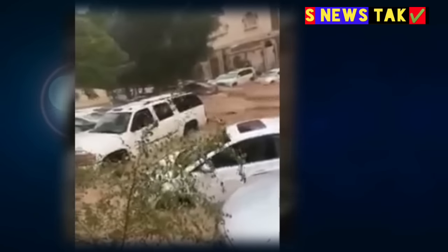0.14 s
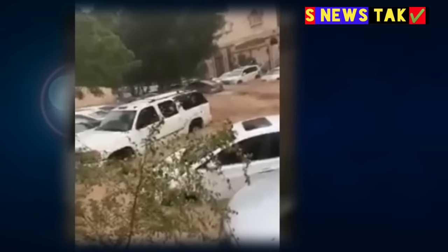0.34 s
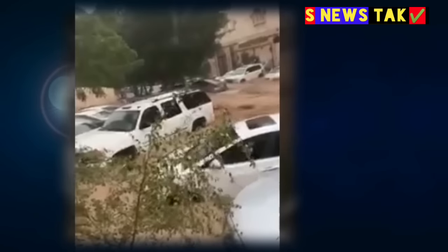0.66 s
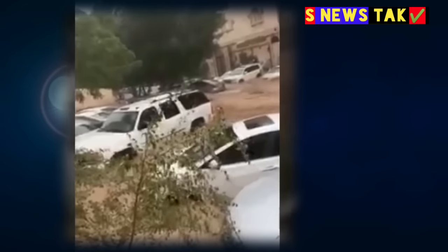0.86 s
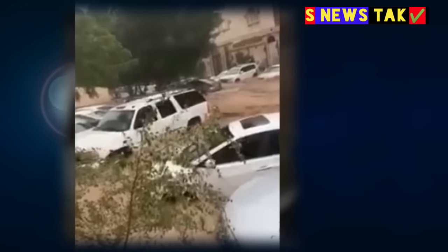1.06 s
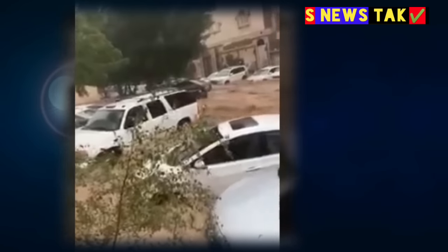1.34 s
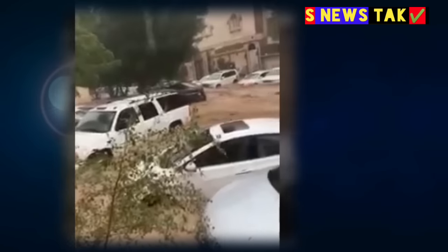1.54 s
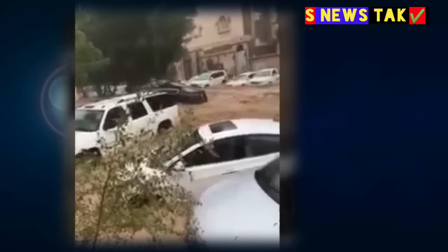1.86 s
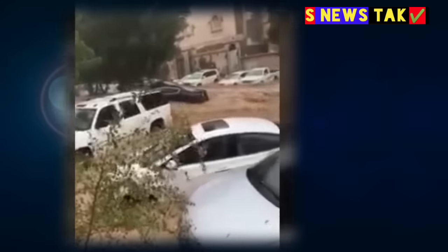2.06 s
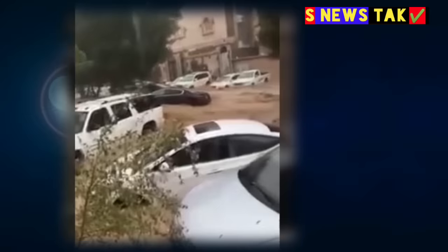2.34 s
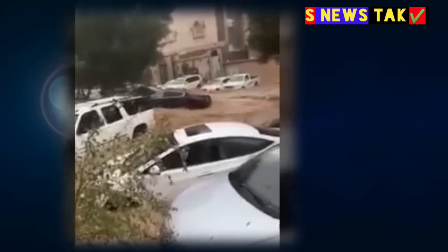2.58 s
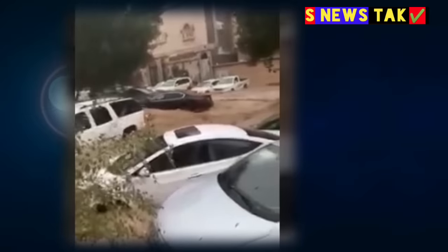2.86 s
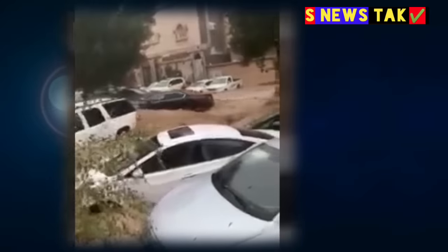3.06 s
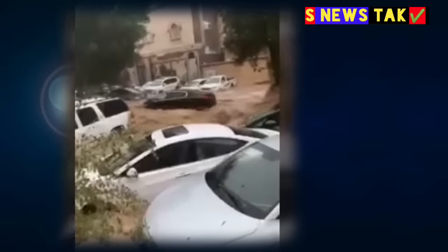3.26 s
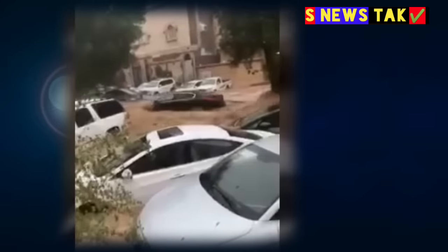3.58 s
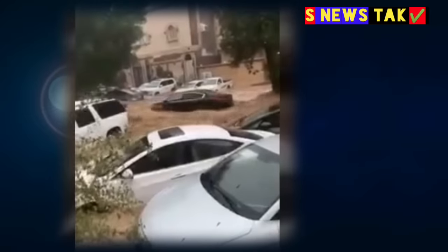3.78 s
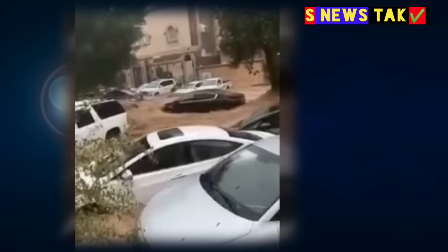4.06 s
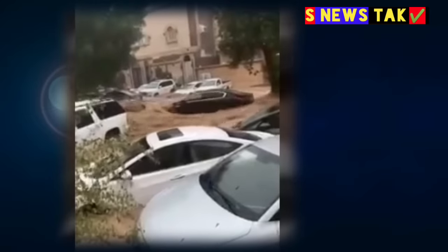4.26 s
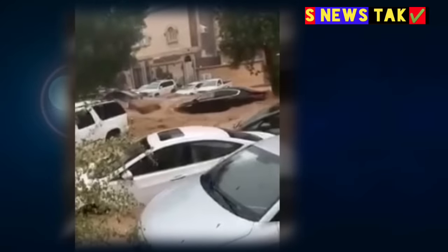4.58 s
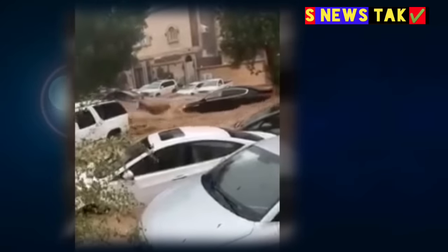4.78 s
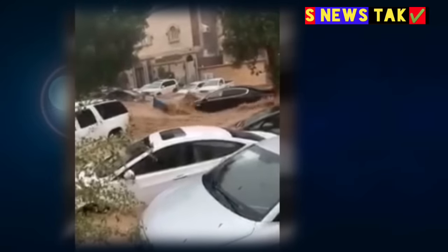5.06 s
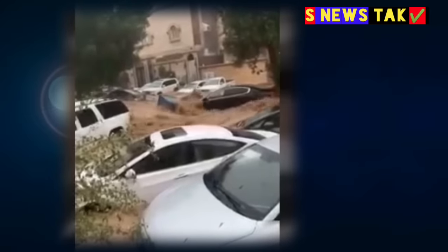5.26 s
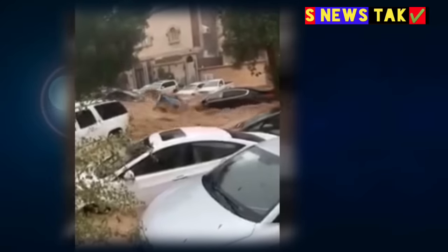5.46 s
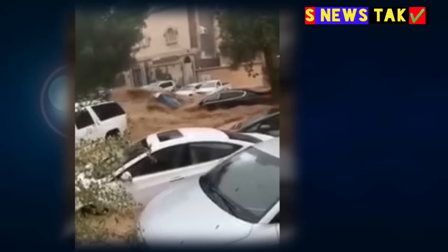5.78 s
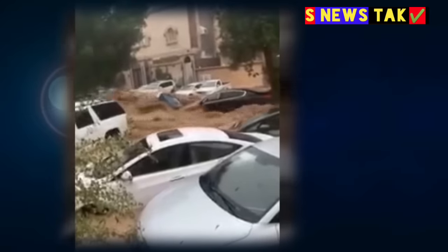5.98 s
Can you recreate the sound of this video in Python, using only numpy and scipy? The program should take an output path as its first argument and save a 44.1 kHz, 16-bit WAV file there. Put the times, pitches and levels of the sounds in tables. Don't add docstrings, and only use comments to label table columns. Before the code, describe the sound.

Loud floodwater runs unbroken for about six seconds: a broad, heavy roar in the lows and low mids, with a softer mid-high hiss of breaking crests, both wavering gently together. At 0.2 s debris gives a quick dull double thump with a small tick; a faint tap follows at 1.0. Around 1.85 a firmer knock on a car panel brings a brief crumple, and a lighter knock lands at 2.6. Low hollow booms pulse under the water, fuller from about 2.3 to 3.1 and again near 4.5. At 4.97 the heaviest blow hits, a tight cluster of bangs with a crunch of sheet metal fading over a few tenths, then low thuds and a deep rumbling swell around 5.4 to 5.7. The torrent pushes on to the end. Close, mono phone sound, outdoors from a doorway, with no distinct echo.

```python
import sys
import numpy as np
from scipy import signal
from scipy.fft import rfft, irfft, next_fast_len
from scipy.io import wavfile
from scipy.ndimage import uniform_filter1d, map_coordinates

SR = 44100
rng = np.random.default_rng(int(sys.argv[2]) if len(sys.argv) > 2 else 0)


def voltage_ratio(level):
    return 10 ** (np.asarray(level, float) / 20)


def generate_wav(signal):
    frames = np.transpose(np.atleast_2d(signal))
    scaled = np.clip(frames, -1, 1) * 32767
    pcm = np.round(scaled).astype(np.int16)
    wavfile.write(sys.argv[1], SR, pcm)


N = 270333

# time_s, level_db
FLOW = [
    (0, -1),
    (1.1, .5),
    (1.5, -0.7),
    (3.7, 0.5),
    (4.9, 0),
    (5.53, 1),
    (5.7, -0.5),
    (6.13, 1),
]
# freq_hz, density_db (per Hz)
ROAR = [(40, -63), (70, -8), (110, 2), (170, -0.5), (290, -5.5), (460, -5.5), (580, -8.5), (700, -14.5),
        (1000, -16.5), (1300, -27.5), (1600, -46), (2500, -120)]
# freq_hz, density_db (per Hz)
SPRAY = [(760, -45.5), (1300, -16.5), (1500, 1), (1590, 1), (2050, -6), (2560, -5.5), (4320, -21.5),
         (6030, -22), (8170, -31), (8700, -39), (10200, -43.5), (11800, -35), (12500, -31), (13900, -33.5),
         (14300, -39)]


def torrent():
    flow_db, = curves(FLOW)
    surge = wobble(knots_per_s=3.09)

    roar_source = patchy(patchy_db=0.06) + 0.25 * splashes(spread_db=2.5, count=3000)
    roar_gain = voltage_ratio(-22.0 + flow_db + 0.38 * surge + 0.21 * wobble(knots_per_s=9))
    roar = roar_gain * coloured(roar_source, ROAR)

    spray_source = patchy(patchy_db=1.1) + 0.24 * splashes(spread_db=2.0, count=12000)
    spray_gain = voltage_ratio(-33.69 + 0.71 * flow_db + 0.46 * surge + 0.37 * wobble(knots_per_s=12))
    spray = spray_gain * coloured(spray_source, SPRAY)
    return roar + spray


def patchy(patchy_db):
    bins = signal.stft(rng.standard_normal(N), nperseg=512)[2]
    field = uniform_filter1d(rng.standard_normal(bins.shape), size=6, axis=0)
    field = uniform_filter1d(field, size=10, axis=1)
    noise = signal.istft(bins * voltage_ratio(patchy_db * unit(field)), nperseg=512)[1]
    return unit(noise[:N])


def splashes(spread_db, count):
    when, rarity, side = rng.random((count, 3)).T
    size = voltage_ratio(-spread_db * np.log(1 - rarity)) * np.sign(side - 0.5)
    return unit(np.bincount((when * N).astype(int), size, N))


# start_s, ring_db, pitch_hz, t60_s, tick_db
KNOCKS = [(0.2269, -9, 274, 0.037, -8), (0.2334, -6.5, 135, 0.086, -30), (0.253, -12, 55.7, 0.1, -36),
          (1.0236, -19, 306.5, 0.025, -11), (1.853, -6.5, 426, 0.052, -24), (1.863, -7.5, 284, 0.062, -32),
          (1.9, -18.5, 239.4, 0.26, -27), (2.611, -13.5, 205, 0.058, -9), (4.966, -1.5, 202, .09, -16),
          (4.982, -7.5, 357.4, 0.12, -11), (4.989, -12, 340, 0.09, -10), (5.0, -11.5, 56.3, 0.24, -20),
          (5.02, -11, 120, 0.071, -13), (5.053, -9, 294.2, 0.07, -11), (5.234, -26, 298.6, .03, -9.5),
          (5.38, -16, 200, 0.21, -40), (5.5, -13, 57, .6, -44), (5.54, -12.5, 104.6, 0.15, -40),
          (5.685, -6, 130, 0.043, -26)]
# start_s, level_db, rise_s, t60_s
CRUNCHES = [
    (.228, -39, .005, 0.11),
    (1.85, -18.5, 0.0094, 0.27),
    (4.968, -7.5, 0.022, 0.3),
    (5.05, -21.5, 0.0043, .3),
]
# freq_hz, level_db
METAL = [(60, -18), (200, 8.5), (500, -4.5), (1000, -8), (1300, -27), (1800, -9), (2600, -27), (8000, -46),
         (10000, -100)]
# freq_hz, level_db
PHONE = [(20, -20), (45, -0.5), (2500, -4), (5000, -8), (8000, -24), (9000, -60), (22000, -80)]


def debris():
    t = np.arange(SR // 2) / SR
    blows, crumple_gain = np.zeros(N + SR), np.zeros(N + SR)
    for start_s, ring_db, pitch_hz, t60_s, tick_db in KNOCKS:
        ring_gain = voltage_ratio(ring_db - 60 * t / t60_s) * (1 - np.exp(-t / 0.0022))
        ring = -ring_gain * np.sin(2 * np.pi * pitch_hz * t)
        tick = 1.37 * voltage_ratio(tick_db - 60 * t / 0.0046) * np.sin(2 * np.pi * 950 * t)
        blows[round(start_s * SR):][:len(t)] += 1.19 * (ring + tick)
    for start_s, level_db, rise_s, t60_s in CRUNCHES:
        tail = voltage_ratio(level_db - 60 * t / t60_s) * (1 - np.exp(-t / rise_s))
        crumple_gain[round(start_s * SR):][:len(t)] += tail
    crackle = rng.standard_normal(N) + 0.72 * splashes(spread_db=1.5, count=2500)
    return filtered(blows[:N], PHONE) + crumple_gain[:N] * coloured(crackle, METAL)


# peak_s, pitch_hz (hollow), boom_db, rumble_db
WAVES = [(0.259, 79.1, -27, -24.5), (0.511, 80.8, -30, -35), (.89, 75.9, -31, -36), (1.06, 81.3, -29, -33),
         (1.31, 80, -25.5, -36), (1.66, 69, -24, -36), (1.88, 85.9, -27, -24), (2.08, 94.5, -25.5, -30),
         (2.3, 73.7, -21, -29.5), (2.5, 72, -19.5, -33), (2.66, 72.8, -21.5, -25), (2.92, 78, -20.5, -30),
         (3.139, 88, -21.5, -28), (3.62, 75.8, -30, -33.5), (3.87, 77.7, -26.5, -39),
         (4.12, 85.1, -24, -28.5), (4.34, 68.9, -25, -23.5), (4.48, 87.2, -20.5, -31),
         (4.85, 74.8, -28, -31), (5.04, 78.3, -26.5, -25), (5.3, 70.4, -32, -25), (5.449, 83, -27.5, -20),
         (5.58, 90, -19, -18.5), (5.92, 94, -33, -32), (6.12, 94, -44, -32)]
# freq_hz, density_db (per Hz)
RUMBLE = [(20, -34.5), (35, -2.5), (55, 14.5), (68, 10.5), (100, -24), (150, -86.5)]


def boom():
    peak_s, wave_hz, boom_db, rumble_db = np.transpose(WAVES)
    pitch_hz = np.interp(np.arange(N) / SR, peak_s, wave_hz)
    pitch_hz = pitch_hz + 4.94 * wobble(knots_per_s=18)
    phase = 2 * np.pi * np.cumsum(pitch_hz) / SR
    flutter = voltage_ratio(1.8 * wobble(knots_per_s=15))
    hollow = unit(flutter * np.sin(phase))
    hollow_gain = swells(peak_s, boom_db, rise_db_per_s=67.5, fall_db_per_s=90.5, calm_db=-44.5)
    rumble = coloured(rng.standard_normal(N), RUMBLE)
    rumble_gain = swells(peak_s, rumble_db + 2.0, rise_db_per_s=169.5, fall_db_per_s=188.5, calm_db=-35.5)
    return hollow_gain * hollow + rumble_gain * rumble


def swells(peak_s, peak_db, rise_db_per_s, fall_db_per_s, calm_db):
    step = 64
    late_s = np.arange(0, N + step, step) / SR - peak_s[:, None]
    slope = np.where(late_s < 0, rise_db_per_s, -fall_db_per_s)
    waves = voltage_ratio(peak_db[:, None] + slope * late_s)
    gain = np.sqrt((waves ** 2).sum(0) + voltage_ratio(calm_db) ** 2)
    return np.interp(np.arange(N) / step, np.arange(len(gain)), gain)


def unit(x):
    return x / np.sqrt(np.mean(x ** 2) + 1e-20)


def curves(rows):
    time_s, *columns = np.transpose(rows)
    return [np.interp(np.arange(N) / SR, time_s, column) for column in columns]


def wobble(knots_per_s):
    return map_coordinates(rng.standard_normal(4000), [np.arange(N) * knots_per_s / SR])


def along(points, hz):
    freq_hz, value = np.transpose(points)
    return np.interp(np.log(hz + 1), np.log(freq_hz + 1), value)


def filtered(x, spectrum):
    size = next_fast_len(N + 8192)
    gain = voltage_ratio(along(spectrum, np.fft.rfftfreq(size, 1 / SR)))
    return irfft(rfft(x, size) * gain, size)[:N]


def coloured(x, spectrum):
    return unit(filtered(x, spectrum))


def scene():
    return (torrent() + debris() + boom())[None]


def low_pass(x):
    return signal.sosfilt(signal.butter(12, 14680, fs=SR, output="sos"), x)


def record(dry):
    return low_pass(dry)


dry = scene()
out = record(dry)
generate_wav(out)
```